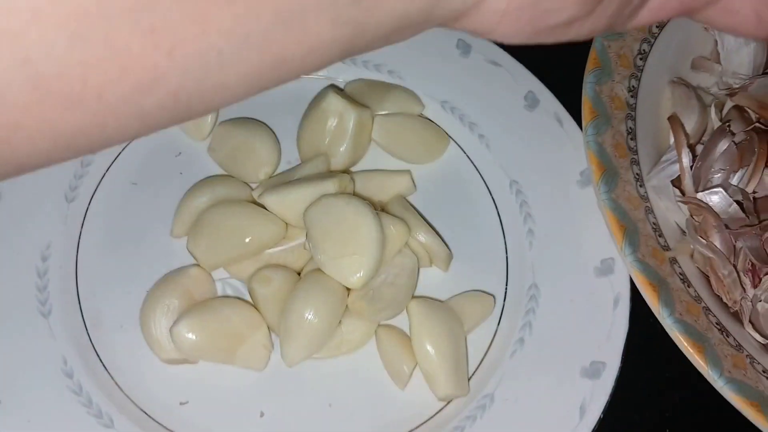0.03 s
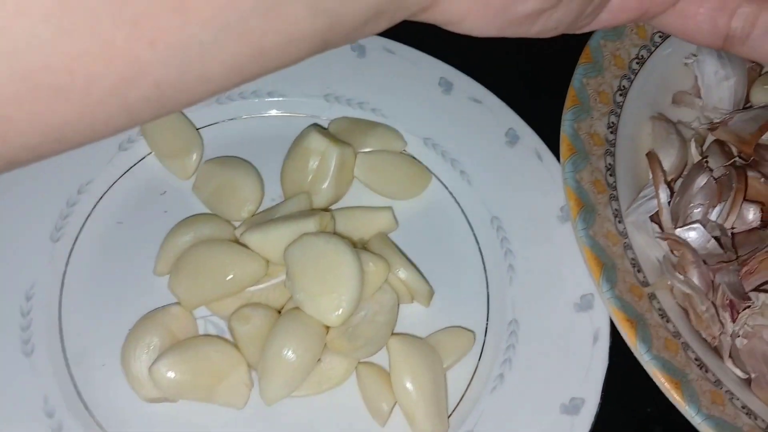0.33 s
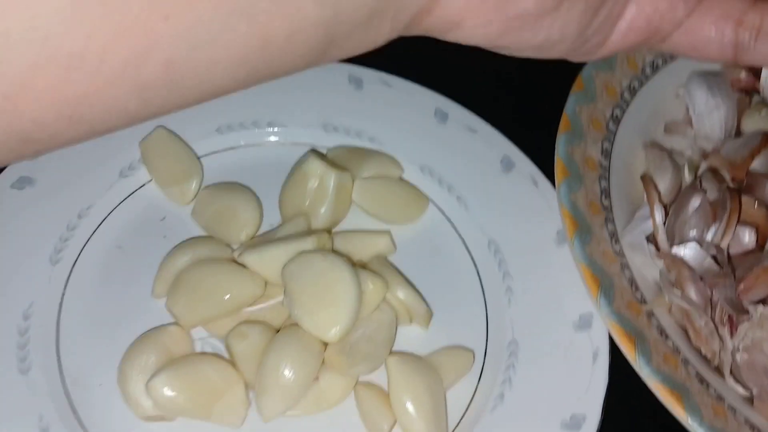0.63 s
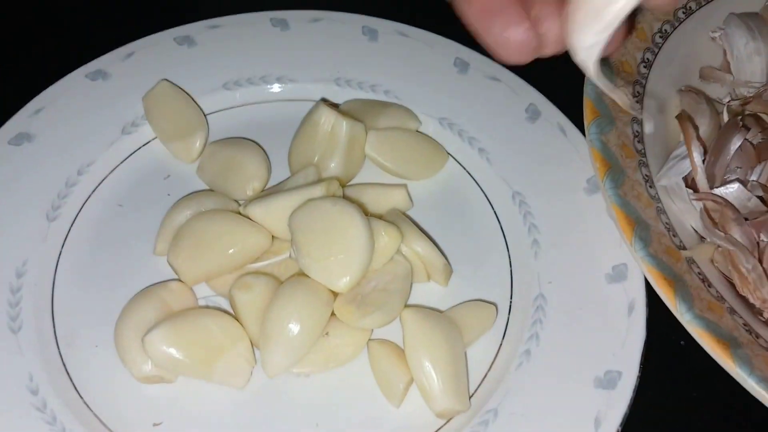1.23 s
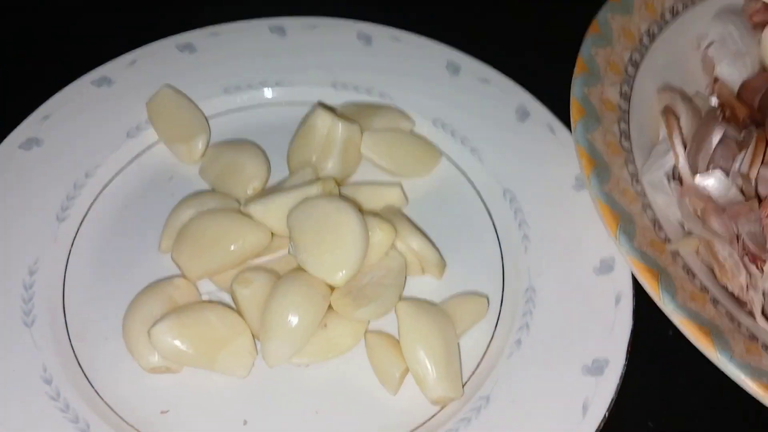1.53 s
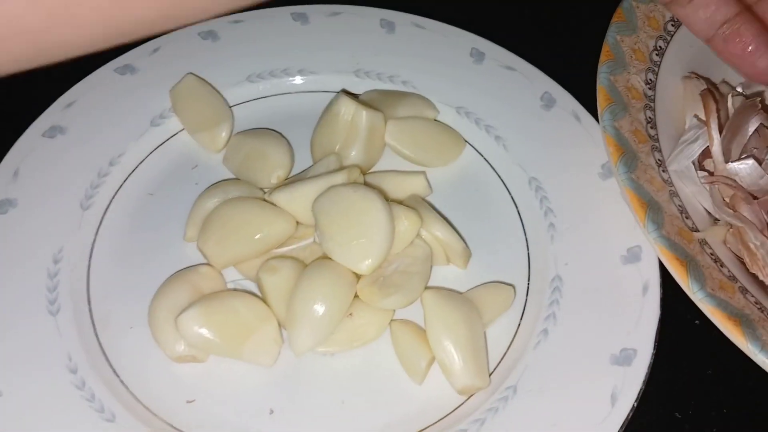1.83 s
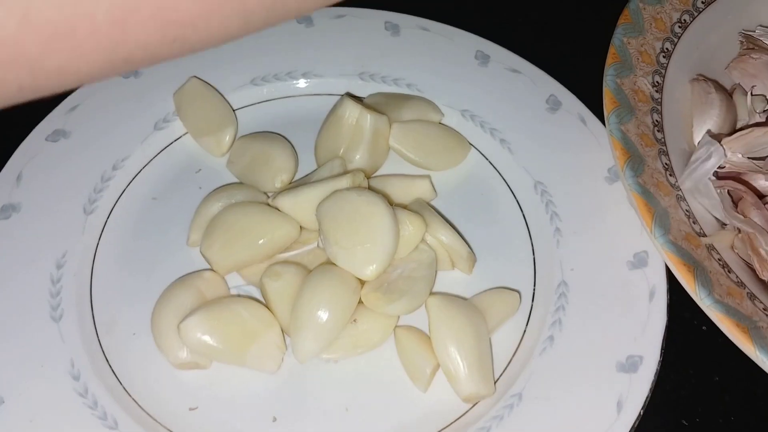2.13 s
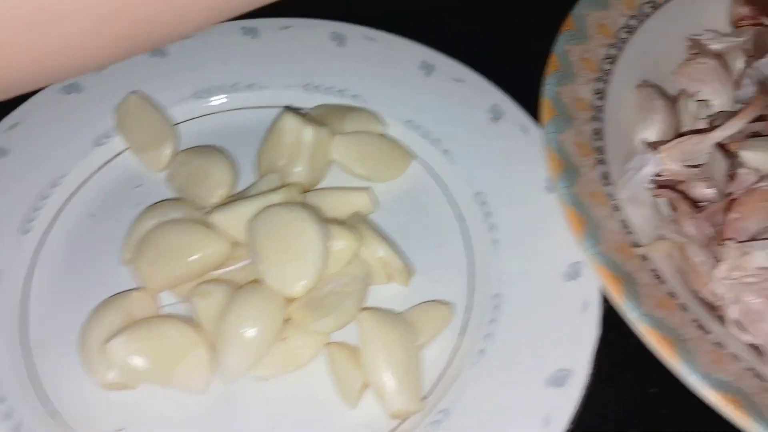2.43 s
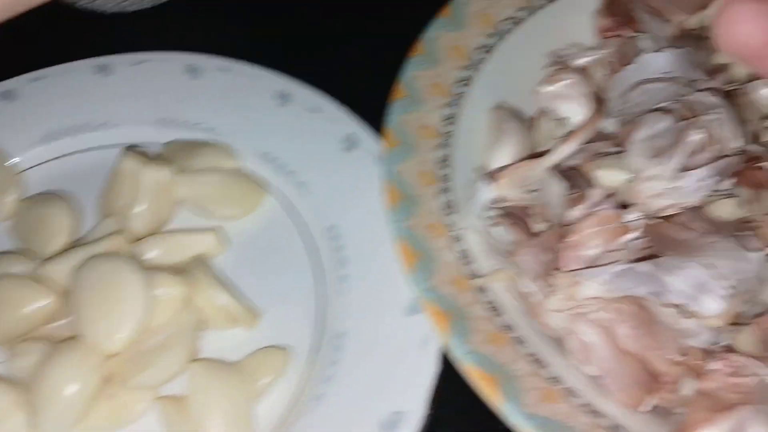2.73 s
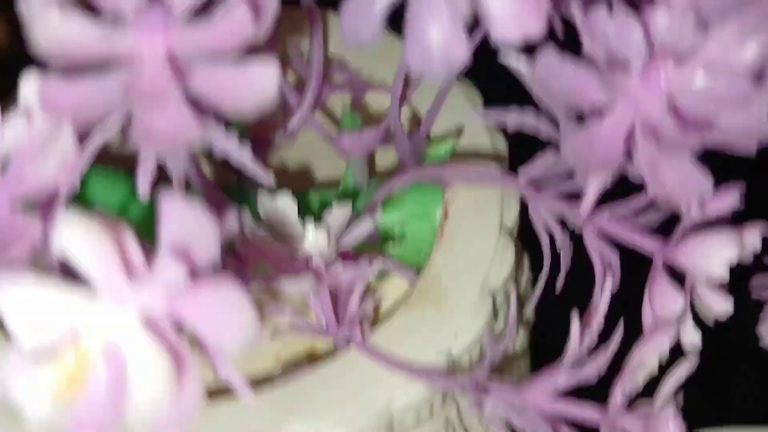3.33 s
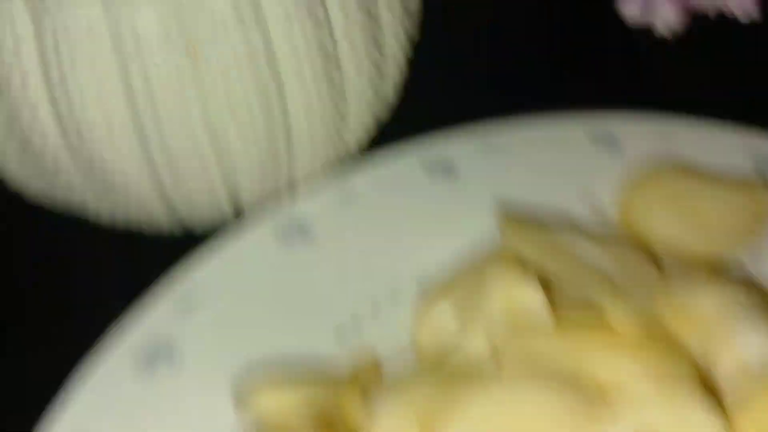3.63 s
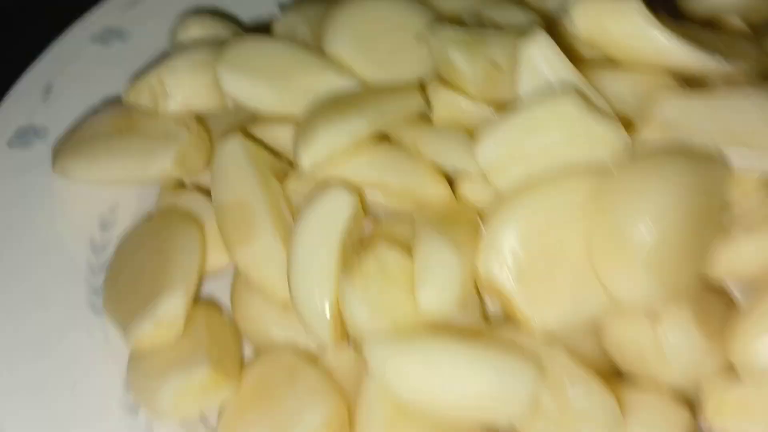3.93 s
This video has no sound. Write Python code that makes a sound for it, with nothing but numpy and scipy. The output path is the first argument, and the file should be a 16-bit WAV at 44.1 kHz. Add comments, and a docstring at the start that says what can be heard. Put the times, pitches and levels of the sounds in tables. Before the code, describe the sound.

Dry garlic skins crinkle and rustle as a hand stirs them in a bowl close to the microphone. Dry ticks follow over kitchen hum and a distant engine. The sound drops out briefly, then something swishes past.

```python
"""A kitchen's hum and hiss come first, with soft brushing, dull handling bumps and a far engine picking
up speed. Close to a phone, a hand stirs dry garlic skins in a bowl: tiny fractures make a few lone
crinkles, then three papery rustles that ring the bowl. Dry ticks follow at the right. The sound cuts
out briefly, fades back in, and something swishes past close to the microphone."""
import sys
import numpy as np
from scipy import signal
from scipy.fft import rfft, irfft
from scipy.io import wavfile

SR = 44100
rng = np.random.default_rng(int(sys.argv[2]) if len(sys.argv) > 2 else 0)


def pcm_store(signal):
    """Save signal as 16-bit PCM."""
    levels = np.round(np.clip(np.atleast_2d(signal), -1, 1) * 32767)
    wavfile.write(sys.argv[1], SR, levels.astype(np.int16).T)


N = 176400
T = np.arange(N) / SR
BIN_HZ = np.arange(N // 2 + 1) * SR / N


def undb(db):
    """Decibels to gain."""
    return 10 ** (np.asarray(db) / 20)


def curve(rows, column=1):
    """One table column, linear in time."""
    rows = np.array(rows)
    return np.interp(T, rows[:, 0], rows[:, column])


def per_bin(points):
    """Points joined on a log-frequency axis."""
    hz, value = np.array(points).T
    return np.interp(np.log(BIN_HZ + 1e-3), np.log(hz), value)


def sides(pan_db):
    """Left and right gains for an L-R balance."""
    gains = undb(np.array([[.5], [-.5]]) * pan_db)
    return gains / np.sqrt(np.mean(gains ** 2, axis=0))


def noise():
    """White noise, independent left and right."""
    return rng.standard_normal((2, N))


def drift(rate_hz):
    """Slow random drift, spread near 1."""
    return 1.2 * np.interp(T * rate_hz, np.arange(4000), rng.standard_normal(4000))


# Each row: frequency in Hz, L/R correlation.
CORRELATION = [(100, 0.8), (260, 0.95), (450, 0.74), (750, 0.32), (1300, -0.25), (3000, 0.031),
               (16000, -0.052)]


def colour(white, tone, pan_db=0):
    """Shapes a white pair at equal power; bass is shared, treble is not."""
    gain = undb(per_bin(tone))
    angle = np.arcsin(np.clip(per_bin(CORRELATION), -.99, .99)) / 2
    left, right = rfft(white)
    pair = np.array([left, right]) * np.cos(angle) + np.array([right, left]) * np.sin(angle)
    return irfft(pair * sides(pan_db) * gain / np.sqrt(np.mean(gain ** 2)), N)


def ring(x, resonances):
    """Boosts or cuts narrow bands."""
    gain = 1 + sum((undb(db) - 1) / (1 + 2j * (BIN_HZ - hz) / width) for hz, width, db in resonances)
    return irfft(rfft(x) * gain, N)


# Room and phone. Each row: centre in Hz, width in Hz, boost in dB.
ROOM_MODES = [(225, 6.5, 4), (242.8, 4.2, 4.5), (324.3, 14, 4), (339, 4.5, 5), (424, 14, 3.5), (475, 20, 2),
              (699, 5.5, 5.5), (945, 45, 3), (1141, 11, 6.5), (1544, 24, 4), (2765, 70, 4.5)]
# Each row: frequency in Hz, relative density in dB.
KITCHEN_TONE = [(20, -22.5), (45, -6.5), (70, -14.5), (130, 2), (190, -10), (245, -2), (290, -4.5),
                (340, -0.5), (450, -4), (650, -11.5), (1000, -12), (1500, -14.5), (2000, -15),
                (2800, -18.5), (3500, -24), (5000, -29), (7500, -32), (8600, -42), (13000, -41.5),
                (16000, -53.5)]
# Each row: frequency in Hz, L-R in dB.
KITCHEN_PAN = [(300, -1.5), (900, -3), (1500, -6), (2200, -10.5), (3100, -15.5), (5000, -11), (7500, -12.5),
               (8700, 1.5), (10500, -9), (14000, -18.5)]
# Each row: time in seconds, level in dB.
DRONE_LEVEL = [(0, -64.5), (.25, -55.5), (.6, -52), (.75, -72.5), (1.1, -77)]
AIR_DB, FLICKER_DB, MAINS_HZ, MAINS_DB = -48, 0.69, 49.15, -55.5


def kitchen():
    """Resonant room noise, hissier at the right, with mains hum and a low drone that dies away."""
    air = noise() * undb(AIR_DB + FLICKER_DB * drift(12))
    air = ring(colour(air, KITCHEN_TONE, per_bin(KITCHEN_PAN)), ROOM_MODES)
    drone_tone = [(150, -47), (228, -18), (245, 4), (275, -8), (450, -54)]  # Hz, dB
    drone = colour(noise() * undb(curve(DRONE_LEVEL)), drone_tone)
    hum = np.sqrt(2) * undb(MAINS_DB + .8 * drift(9.1)) * np.sin(2 * np.pi * MAINS_HZ * T)
    return air + drone + hum


# Each row: time in seconds, level in dB.
BRUSH_LEVEL = [(0, -58.5), (.2, -62.5), (.47, -50.5), (.62, -48.5), (.8, -55.5), (.95, -68)]
# Each row: frequency in Hz, relative density in dB.
BRUSH_TONE = [(150, -14.5), (280, 19), (600, -3), (1500, 7), (2800, 5), (3700, 1.5), (5100, 3.5),
              (7000, -6), (9000, -14), (13000, -27), (16000, -32)]


def brush():
    """Soft brushing noise, coloured by the room."""
    rubbing = noise() * undb(curve(BRUSH_LEVEL))
    return ring(colour(rubbing, BRUSH_TONE, per_bin(KITCHEN_PAN)), ROOM_MODES)


def grains(per_s, spread_db):
    """Dense tiny impulses of random size, unit RMS."""
    hits = rng.random(N) < per_s / SR
    size = undb(spread_db * np.minimum(rng.exponential(size=N), 6))
    impulses = hits * size * noise()
    return impulses / np.std(impulses)


def scatter(x, decay_s=.012, wet_db=-4):
    """Adds short reflections from bowl and table."""
    tail = rng.standard_normal((2, 8192)) * np.exp(-T[:8192] / decay_s)
    tail /= np.sqrt(np.sum(tail ** 2, axis=1, keepdims=True))
    reflected = signal.fftconvolve(x, tail, axes=1)[:, :N]
    return (x + undb(wet_db) * reflected) / np.hypot(1, undb(wet_db))


# Each row: time in seconds, level in dB.
STIR_LEVEL = [(0, -87), (.07, -68), (.2, -75), (.9, -68.5), (1.02, -80), (1.17, -69.5), (1.22, -69),
              (1.385, -70), (1.405, -49.5), (1.475, -46), (1.515, -53), (1.62, -53), (1.68, -51.5),
              (1.718, -45.5), (1.78, -56.5), (1.83, -49), (1.885, -57.5), (1.935, -45.5), (2.0, -53),
              (2.05, -63.5), (2.2, -91), (2.44, -88.5), (2.51, -62), (2.6, -79)]
TOUCH_LEVEL = [(0, -67), (.08, -64), (.2, -95), (.45, -84), (.65, -61.5), (.85, -70), (.97, -66),
               (1.01, -62), (1.09, -66), (1.19, -68), (1.23, -64), (1.36, -71), (1.46, -43.5), (1.53, -72),
               (2.0, -61.5), (2.15, -73), (2.44, -81), (2.51, -66.5), (2.6, -74), (3.15, -71.5)]
# Each row: frequency in Hz, relative density in dB.
SKIN_TONE = [(400, -18), (950, -4.5), (1500, 0), (3000, -2), (5000, 1), (7300, 1), (8800, -7),
             (11000, -3.5), (13300, -2.5), (16000, -5)]
FIZZ_TONE = [(3000, -34), (7000, -10.5), (8800, -10), (11000, -1.5), (13500, 2), (16000, -1.5)]
# Each row: frequency in Hz, L-R in dB.
SKIN_PAN = [(1500, -10), (4500, -1), (7000, -10), (9000, 4), (12000, 0.5), (15000, -2)]
# Each row: centre in Hz, width in Hz, boost in dB.
BOWL_MODES = [(962, 50, 16), (2740, 88, 7.5)]
PATCHY_DB = 1.44


def skins():
    """Stirred skins fracture in patches and ring the bowl; a fingertip's touch gives a high crackle."""
    effort = undb(curve(STIR_LEVEL) + PATCHY_DB * drift(130))
    stirred = scatter(grains(per_s=8600, spread_db=1.5) * effort)
    stirred = ring(colour(stirred, SKIN_TONE, per_bin(SKIN_PAN)), BOWL_MODES)
    touched = scatter(grains(per_s=4500, spread_db=2) * undb(curve(TOUCH_LEVEL)))
    return stirred + colour(touched, FIZZ_TONE, pan_db=-7.5)


# Each row: start in seconds, level in dB, L-R in dB.
CRACKS = [(.0737, -46, -5), (0.9978, -50, 6), (1.208, -57, -9), (1.4035, -52, 2), (1.6268, -52, 2),
          (1.633, -52, 1), (1.672, -51, 2), (1.7148, -43, -3), (1.829, -42, 3), (1.838, -47.5, -3),
          (1.904, -44, 6), (1.9334, -41, 5), (1.9367, -41, 9.5), (1.9723, -39, 1), (2.079, -49, 2)]
# Each row: frequency in Hz, relative density in dB.
CRACK_TONE = [(800, -33.5), (3000, -2.5), (7000, -6), (8700, -8), (10500, -1), (14000, 6.5), (16000, -20.5)]
CRACK_DECAY_S = 0.00078


def cracks():
    """A skin snaps: an instant dry burst, gone in a millisecond or two."""
    envelope = 0
    for start, db, pan_db in CRACKS:
        decay = (T >= start) * np.exp(-np.abs(T - start) / CRACK_DECAY_S)
        envelope += undb(db) * sides(pan_db) * decay
    return colour(envelope * noise(), CRACK_TONE)


# Each row: peak time in seconds, level in dB, decay in seconds, L-R in dB.
CRINKLES = [(0.076, -47, 0.0039, 2), (0.997, -45, 0.0049, 1), (1.209, -56, .008, -8),
            (1.396, -51.5, 0.0098, 0), (1.631, -47, 0.01, 3), (1.817, -53, .005, 2)]
CRINKLE_ATTACK_S = .002


def crinkles():
    """A buckling skin gives a short, bright run of fractures."""
    envelope = 0
    for peak_s, db, decay_s, pan_db in CRINKLES:
        shape = np.exp(-np.maximum((peak_s - T) / CRINKLE_ATTACK_S, (T - peak_s) / decay_s))
        envelope += undb(db) * sides(pan_db) * shape
    return colour(scatter(envelope * grains(per_s=21000, spread_db=4)), CRACK_TONE)


# Each row: time in seconds, firing rate in Hz, harmonics 2, 3 and 4 in dB, rumble in dB.
ENGINE = [(.3, 30, -85, -70, -75, -72), (.48, 30, -80, -64, -79, -53.5), (.6, 31, -49, -55, -64, -47),
          (.78, 32.46, -62, -47.5, -46, -50.5), (.9, 34, -53, -65, -44.5, -49.5),
          (1.22, 38.22, -67, -52, -48, -49), (1.54, 40.1, -52, -73, -53, -49),
          (1.8, 40.8, -55.5, -52, -52, -49.5), (2.1, 40.8, -59, -51, -54.5, -49.5),
          (2.5, 41, -62, -50.5, -53.5, -51), (2.84, 41.4, -52.5, -55, -48, -51),
          (3.14, 40.5, -57.5, -57, -55.5, -51.5), (3.45, 41, -68.5, -75.5, -65.5, -87),
          (4, 41, -81, -52.5, -55.5, -51.5)]
# Each row: frequency in Hz, relative density in dB.
RUMBLE_TONE = [(30, -26), (70, -10.5), (130, -1), (190, -6.5), (260, -4.5), (380, -8), (600, -12),
               (1000, -12), (1600, -25.5), (3000, -53), (8000, -59)]


def engine():
    """Through the walls: three harmonics of the firing rate and a rumble that throbs with it."""
    firing_hz = curve(ENGINE) * (1 + 0.0048 * drift(15))
    phase = 2 * np.pi * np.cumsum(firing_hz) / SR
    harmonics = 0
    for k in (2, 3, 4):
        level_db = curve(ENGINE, column=k) + 0.7 * drift(15)
        harmonics += np.sqrt(2) * undb(level_db) * np.sin(k * phase)
    throb = 1 + 0.17 * np.cos(phase)
    rumble = noise() * throb * undb(curve(ENGINE, column=5))
    return harmonics + ring(colour(rumble, RUMBLE_TONE), ROOM_MODES)


# Each row: peak time in seconds, level in dB, half-width in seconds, centre in Hz.
BUMPS = [(0.545, -42.5, 0.041, 128.4), (0.62, -48.5, 0.059, 260), (0.637, -50.5, 0.035, 78.5),
         (0.784, -45.5, .03, 68)]


def bumps():
    """Handling gives a few dull, low swells."""
    out = 0
    for peak_s, db, width_s, hz in BUMPS:
        push = noise() * undb(db) * np.exp(-((T - peak_s) / width_s) ** 2)
        out += colour(push, [(hz / 2, -18), (hz, 0), (hz * 2, -11), (hz * 10, -60)])
    return out


# Each row: peak time in seconds, level in dB, half-width in seconds.
SCRAPES = [(1.476, -47, 0.02), (1.575, -54.5, .03), (1.684, -50, .027)]
# Each row: frequency in Hz, relative density in dB.
SCRAPE_TONE = [(600, -17), (1400, 6.5), (4000, 3.5), (6200, 2.5), (8500, -25.5), (16000, -30)]


def scrapes():
    """Thick skins drag over one another in short, duller strokes that ring the bowl."""
    envelope = sum(undb(db) * np.exp(-((T - peak_s) / width_s) ** 2) for peak_s, db, width_s in SCRAPES)
    friction = scatter(envelope * grains(per_s=3000, spread_db=0))
    return ring(colour(friction, SCRAPE_TONE, pan_db=-5), BOWL_MODES)


# Each row: time in seconds, snap in dB, body in dB.
TICKS = [(2.7894, -31.5, -28.5), (2.921, -45, -63), (2.9369, -33.5, -53)]
# Each row: frequency in Hz, relative density in dB.
SNAP_TONE = [(800, -6), (3000, -4), (7000, 2), (9000, -9), (13000, 3), (16000, -2.5)]
TICK_HZ, TICK_BODY_S = 2100, 0.00022


def ticks():
    """Dry ticks at the right: an instant snap and a cycle or two of body."""
    snap, body = 0, 0
    for time_s, snap_db, body_db in TICKS:
        age = T - time_s
        snap += undb(snap_db) * np.sinc(age * SR)
        body += undb(body_db) * np.cos(2 * np.pi * TICK_HZ * age) * np.exp(-(age / TICK_BODY_S) ** 2)
    return (colour(np.array([snap, snap]), SNAP_TONE) + body) * sides(pan_db=-24)


# Each row: time in seconds, level in dB.
SWISH_LEVEL = [(3.53, -73), (3.64, -48), (3.7, -40), (3.745, -36.5), (3.79, -36), (3.84, -40.5),
               (3.92, -48.5), (4, -56)]
# Each row: frequency in Hz, relative density in dB.
SWISH_TONE = [(150, -11.5), (340, 1.5), (700, -11), (1300, -11), (2000, -1.5), (3100, 0), (4500, -4),
              (6200, -6.5), (7600, -6), (8800, -13), (12500, -9.5), (16000, -17)]
# Each row: frequency in Hz, L-R in dB.
SWISH_PAN = [(1000, 1.5), (2800, -9.5), (4500, -6.5), (7500, -9.5), (9000, -1.5), (14000, -3.5)]
# Each row: centre in Hz, width in Hz, gain in dB.
SWISH_MODES = [(2800, 180, 2.5), (3400, 78, -2), (3985, 48, 7)]
HISS_LEAD_S, HISS_RELATIVE_DB = 0.045, -12


def swish():
    """A close, fine-grained rub, led by a thin hiss."""
    level_db, pan_db = curve(SWISH_LEVEL), per_bin(SWISH_PAN)
    rub = grains(per_s=16000, spread_db=-0.5) * undb(level_db + 0.55 * drift(110))
    hiss = noise() * undb(np.interp(T + HISS_LEAD_S, T, level_db) + HISS_RELATIVE_DB)
    return ring(colour(rub, SWISH_TONE, pan_db), SWISH_MODES) + colour(hiss, FIZZ_TONE, pan_db)


def scene():
    """All sources summed."""
    garlic = skins() + scrapes() + crinkles() + cracks()
    return garlic + ticks() + brush() + swish() + bumps() + engine() + kitchen()


CUT_S, CUT_DECAY_S, RESUME_S, FADE_S, TOP_HZ = 3.155, 0.0044, 3.38, 0.097, 15800


def record(dry):
    """The phone pauses, fades back in and cuts the top treble."""
    cut = np.exp(-np.maximum(T - CUT_S, 0) / CUT_DECAY_S)
    fade_in = 1 - np.exp(-(np.maximum(T - RESUME_S, 0) / FADE_S) ** 1.1)
    lowpass = signal.ellip(10, .2, 70, TOP_HZ, fs=SR, output="sos")
    return signal.sosfilt(lowpass, dry * (cut + fade_in))


dry = scene()
out = record(dry)
pcm_store(out)
```